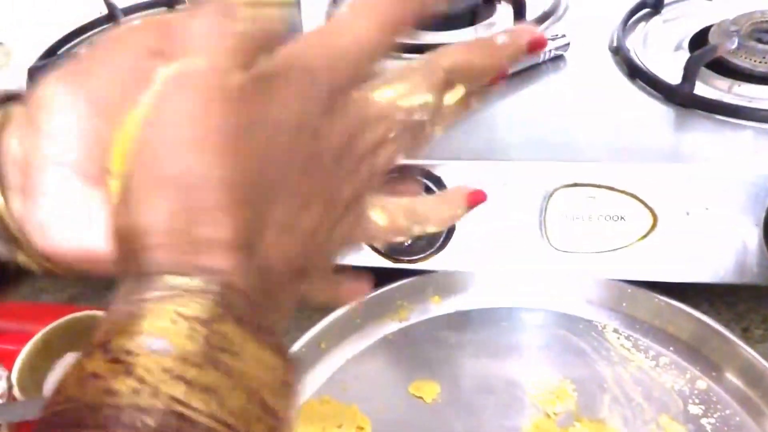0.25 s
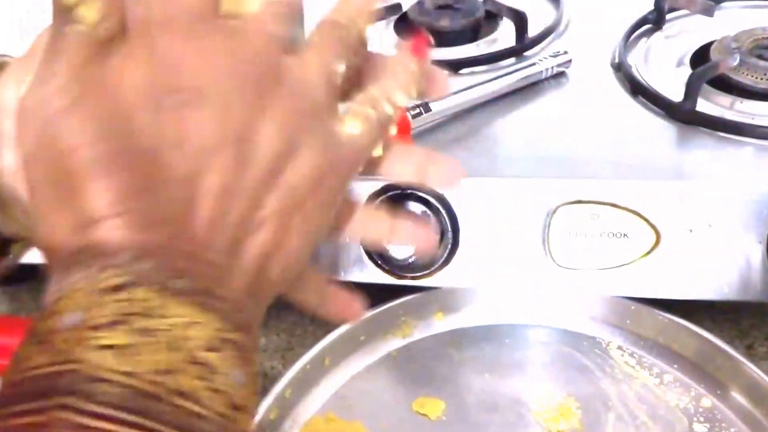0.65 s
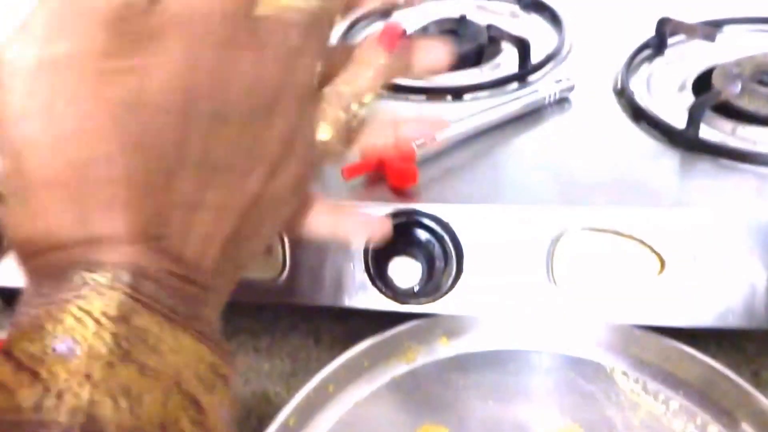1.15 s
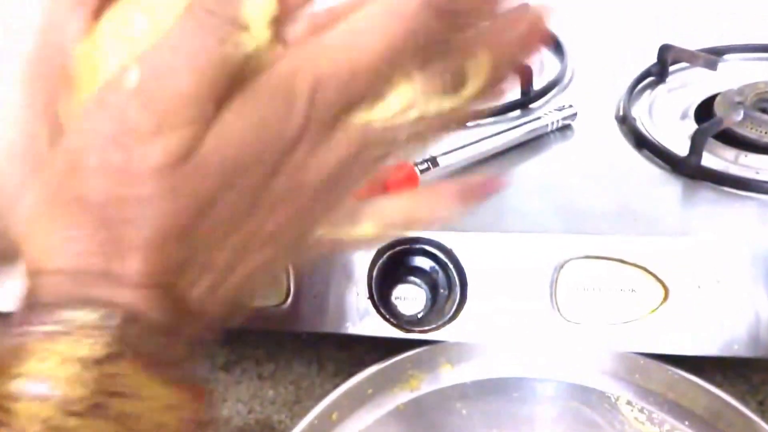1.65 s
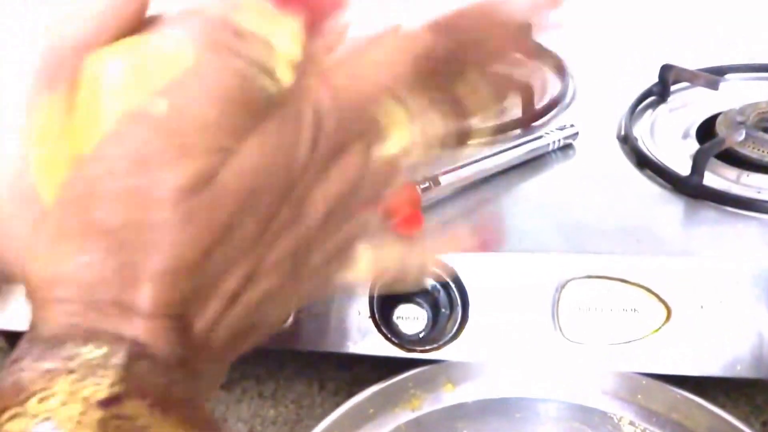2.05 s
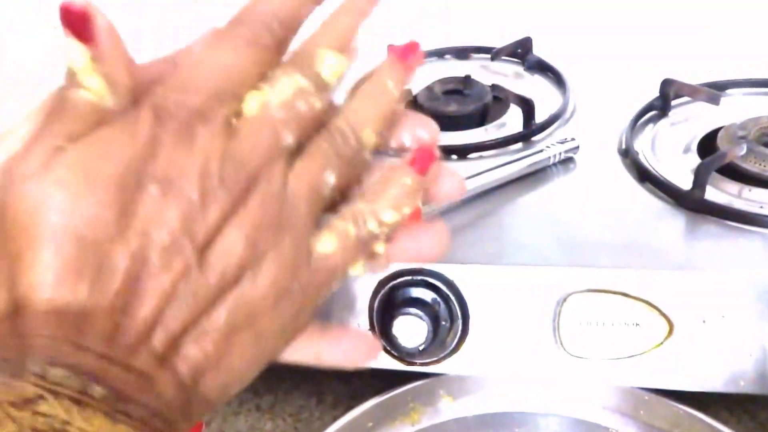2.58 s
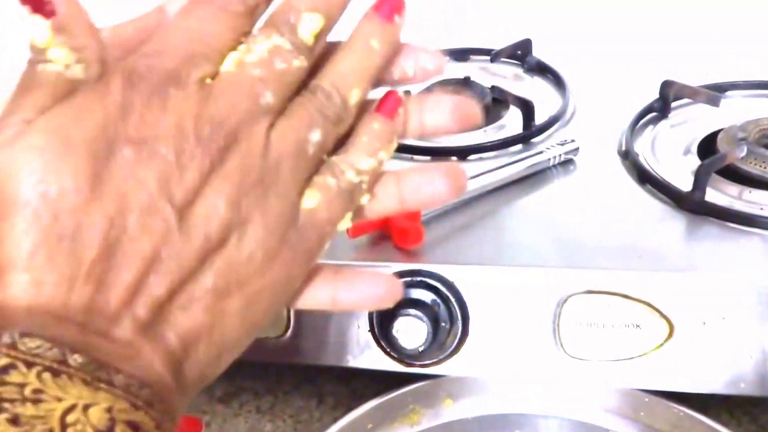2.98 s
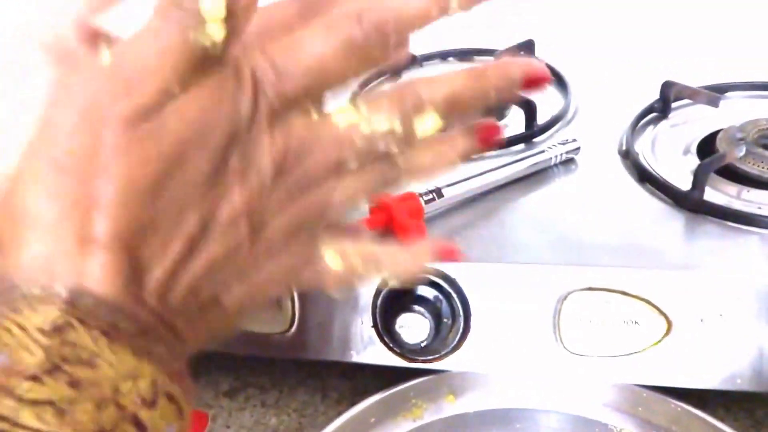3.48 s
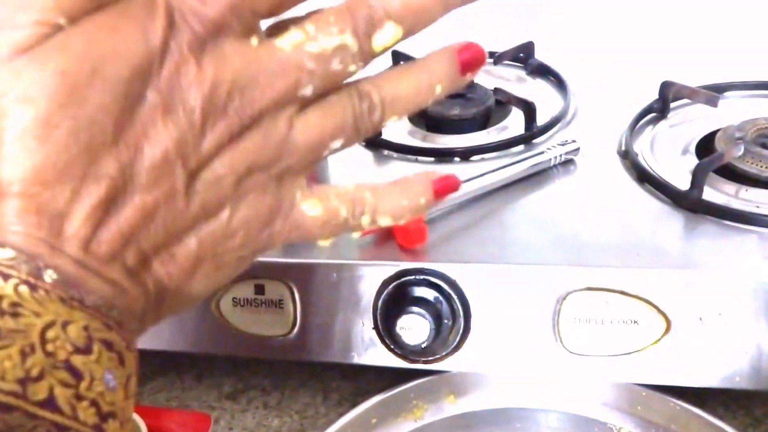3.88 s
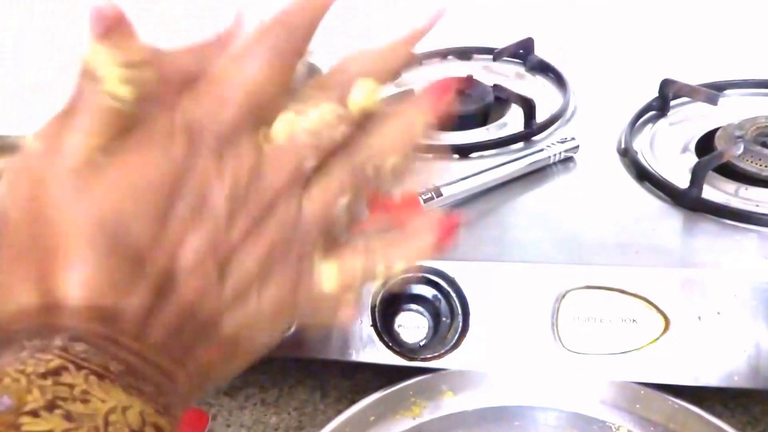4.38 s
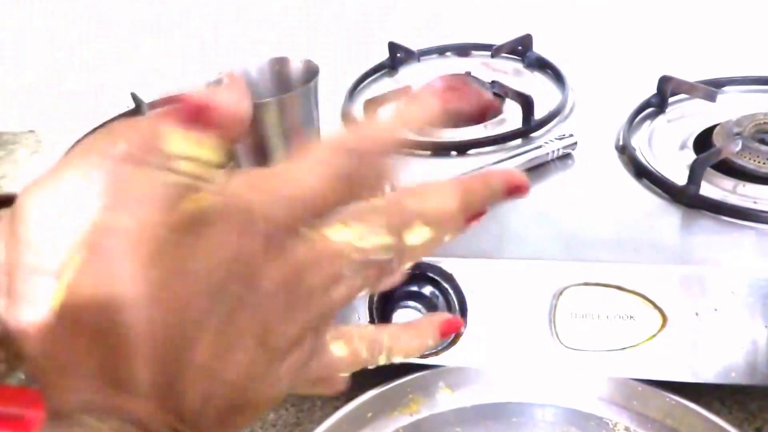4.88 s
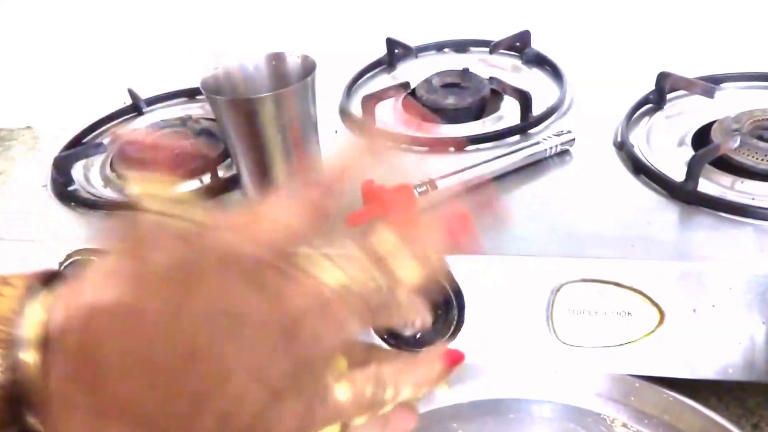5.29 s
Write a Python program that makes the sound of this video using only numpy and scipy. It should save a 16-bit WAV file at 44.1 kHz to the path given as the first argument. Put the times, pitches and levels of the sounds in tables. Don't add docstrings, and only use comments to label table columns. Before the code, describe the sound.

A close, small-microphone recording of dough patted between two hands in a hard, lively kitchen. Two faint pats with sharp bangle clinks come at 0.1 to 0.2 s, then from 0.44 s firm slaps follow about every 0.2 s until 2.35 s, with a weaker one at 2.56 s. Each is a short cluster of finger contacts: hollow air puff, slightly wet crack, bright room ring of about half a second. Thin high bangle clinks scatter between. From 2.7 to 3.3 s there is mostly quiet air, soft burner hiss and faint low motor drone. A weak pat at 3.39 s, a clink at 3.55 s, floury rubbing and a tiny falling squeak at 3.6 s precede a pat at 3.7 s. Dry sliding swishes lead to five strong pats from 4.17 to 5.06 s. Light sticky touches and small clinks finish around 5.3 to 5.4 s.

```python
import sys
import numpy as np
from scipy import signal
from scipy.fft import rfft, irfft, next_fast_len
from scipy.io import wavfile
from scipy.ndimage import uniform_filter1d

SR = 44100
rng = np.random.default_rng(int(sys.argv[2]) if len(sys.argv) > 2 else 0)


def log_audio(samples):
    frames = np.atleast_2d(samples).T
    limited = np.clip(frames, -1, 1)
    pcm = np.round(limited * 32767).astype(np.int16)
    wavfile.write(sys.argv[1], SR, pcm)


def volts(x):
    e = np.asarray(x, float) / 20
    return 10 ** e


N = 244314
TIME = np.arange(N) / SR
FULL_PAT_DB = -20

# wet crack in dB, lower pocket in dB, pocket ring length as a factor,
# finger gap in Hz, finger gap in dB.
HANDS = [(2.5, 8, 0.9, 3100, -25), (-1, 2, 1.5, 3000, 0), (0, -1.5, 1.1, 5700, 0.5),
         (-14, -8, 0.91, 1840, -8.5), (2.5, 3.5, 1.9, 3220, -3), (1, -2, 1.9, 4800, -4),
         (-1, -6, 1.3, 8600, -18), (3.5, -1, 1.06, 1930, -6), (-3.5, -3, 0.6, 3630, -11.5),
         (3.5, -1, 1.8, 3970, -8), (-1.5, 0, 1.3, 5770, 1.5), (5.5, 3.5, 2.6, 3600, -22),
         (-14, 4, 1.3, 3230, -5.5), (-1.5, -7, 2.8, 3200, -17), (3, -1, 0.99, 3500, -2),
         (-5.5, -21, 0.69, 6400, 0), (1.5, 4.5, 1.1, 2560, -8), (1, 2, 0.6, 2300, -27),
         (-6, 1, 1.15, 3350, -8), (-0.5, -4.5, 1.1, 4900, -28), (-3, 6.5, 2.2, 3300, -13)]
# cupped palm in dB, first crease in Hz, its level in dB,
# second crease in Hz, its level in dB.
CREASES = [(-2.5, 1240, -3, 4560, 2), (-1, 1245, -2, 2775, -4), (2.5, 2020, -11, 3670, -9),
           (-4, 2070, -12, 3300, -13), (-2, 1600, -1, 3330, -2), (-0.5, 1140, -5, 2700, -8),
           (-0.5, 3880, -11, 4800, -10), (0, 3130, -6, 3580, -11), (-1.5, 2200, -12, 4480, -19.5),
           (1, 1260, -4, 3300, -19), (0, 4850, -9, 5500, -10), (0, 780, -2.5, 4045, -20),
           (0.5, 2780, -5, 3000, -11), (-3, 1140, -6, 1530, -2.5), (1.5, 1240, -1, 2320, -6.5),
           (0, 1095, -13, 3695, -11), (-7, 1110, -6, 2285, -10), (-1, 1115, -9, 2765, -12),
           (-1, 1250, -6.5, 2700, -7), (-1, 845, -7, 2650, -13), (-0.5, 1180, -7, 3725, -13)]
CREASE_LIFE_S, CREASE_DIRECT_DB = 0.0029, -9.5


def contact(s, db, hz, wet_db, cycles):
    lead = 150 / SR
    t = np.arange(800) / SR - lead
    after = np.maximum(t, 0)
    k = nearest(s)
    _, _, linger, gap_hz, gap_db = HANDS[k]
    cup_db, *creases = CREASES[k]
    _, _, low_hz, low_db, high_hz, high_db, crack_db = palm(s)

    closing = np.exp(-(t * hz / (.35 * cycles)) ** 2)
    swell = np.where(t < 0, closing, np.exp(-after * hz / (.7 * cycles)))
    puff = -np.cos(2 * np.pi * hz * t) * swell

    ring = np.zeros(len(t))
    for f, g, life in [(low_hz, low_db, .002), (high_hz, high_db, .0013), (gap_hz, gap_db, .001)]:
        ring += volts(g + wet_db - 6.5) * np.sin(2 * np.pi * f * after) * np.exp(-after / (life * linger))
    for f, g in np.reshape(creases, (2, 2)):
        whistle = np.sin(2 * np.pi * f * after) * np.exp(-after / CREASE_LIFE_S)
        ring += volts(g + wet_db + CREASE_DIRECT_DB) * whistle
    push = (volts(cup_db) - 1) * uniform_filter1d(puff + ring, size=40)

    wet = volts(crack_db + wet_db + 3) * signal.lfilter([.6], [1, -.4], rng.standard_normal((2, len(t))))
    snap = np.exp(-np.abs(t) / 0.00071)
    peel = volts(-4.0) * np.exp(-np.abs(t) / np.where(t < 0, 0.0011, 0.0018))
    crack = (wet[0] + 0.29 * wet * [[0], [1]]) * (snap + peel)

    side_db = rng.standard_normal() * np.array([[1], [-1]])
    sound = puff + push + ring * volts(side_db) + crack
    return s - lead, volts(db - 3.5 - duck_db(s + 1 / SR)) * sound * volts(side_db + [[.3], [-.3]])


# start in seconds, peak in dB, trapped air in Hz, upper air pocket in Hz,
# upper pocket in dB.
SLAPS = [(0.0753, -25, 3320, 3240, 5), (0.183, -25.5, 3500, 3720, 5), (0.4367, -4.5, 4430, 3600, -8),
         (0.5486, 1.5, 3530, 4400, -2), (0.6546, -21, 2860, 3720, 1), (0.8644, -2, 3000, 2600, -0.5),
         (1.0676, -0.5, 2180, 2630, -3), (1.292, -2.5, 2800, 3260, -6), (1.52, 0.5, 2770, 2580, -13.5),
         (1.7363, 0.5, 3270, 3410, -3.5), (1.9349, 1, 3180, 3420, -0.5), (2.1455, -2, 3870, 2200, -16),
         (2.3414, 1.5, 2500, 2620, 1), (2.562, -10, 2120, 2690, -4), (3.389, -18, 1950, 2370, 1),
         (3.6964, -4, 6350, 2000, -4), (4.173, 1, 2880, 3740, -8), (4.4129, -0.5, 2240, 2590, -9.5),
         (4.6215, 0, 1700, 2830, -4.5), (4.8509, -2, 1230, 2550, -17), (5.0644, -0.5, 1380, 2740, -10.5)]
# start in seconds, peak in dB.
FINGERS = [(0.4372, -20), (0.4418, -19), (0.652, -10.5), (0.858, -29), (0.8613, -13.5), (0.8702, -12),
           (1.0662, -20), (1.0738, -18), (1.2888, -3.5), (1.5187, -3.5), (1.7346, -6.5), (1.74, -9),
           (1.9353, -3), (1.9403, -7.5), (2.1488, -10), (2.342, -10), (2.3451, -3), (2.5562, -16),
           (2.5622, -19), (3.387, -29), (3.396, -16.5), (4.1676, -11), (4.1706, -5), (4.415, -6),
           (4.614, -19), (4.6185, -7.5), (4.6276, -4.5), (4.8488, -16.5), (4.852, -9), (4.8558, -9.5),
           (4.8625, -12), (5.0755, -14.5), (5.0619, -22), (5.0696, -11)]
# start in seconds, peak in dB, trapped air in Hz,
# wet crack and pockets in dB.
TOUCHES = [(0.655, -7.5, 1540, 3.5), (0.8028, -23, 2000, -6), (0.731, -28, 7000, -8),
           (0.999, -30, 7500, -8), (1.125, -26, 4460, 0), (3.527, -31, 9070, -6), (3.6, -22, 6000, -14),
           (3.622, -30, 7000, -6), (3.649, -25, 7000, -13), (3.708, -22, 7000, -9), (4.028, -24, 7000, -9),
           (4.1, -21, 6500, -6), (4.185, -17, 8000, 3), (4.265, -17, 6200, -11), (4.27, -32, 3180, -9),
           (5.282, -19, 2400, -4), (5.289, -22.5, 1620, 1.5), (5.4205, -32, 2300, -16),
           (5.375, -37, 4650, -8), (5.4125, -30, 4600, -15), (5.413, -22.5, 2100, -14),
           (5.4158, -28, 2470, -18)]
TOUCH_CYCLES = 2.2


def fingers():
    out = np.zeros((2, N))
    firm = [row[:3] for row in SLAPS] + [(s, db, palm(s)[0]) for s, db in FINGERS]
    contacts = [row + (0, 1) for row in firm] + [row + (TOUCH_CYCLES,) for row in TOUCHES]
    for row in contacts:
        add(out, *contact(*row))
    return out


# start in seconds, echo in dB, lower air pocket in Hz,
# cupped palm in Hz, smack in dB.
PATS = [(0, -47, 1110, 1120, 11.5), (0.181, -50.5, 1220, 1500, 1), (0.437, -39.5, 1000, 1400, 7.5),
        (0.548, -43.5, 1490, 1730, -14), (0.6545, -32.5, 1094, 1350, -9), (0.8643, -33.5, 1136, 1800, 3),
        (1.0685, -36.5, 1030, 1490, 10), (1.2879, -31.5, 950, 1390, 6.5), (1.5197, -16.5, 1010, 1450, -2.5),
        (1.7356, -30.5, 930, 1400, 7), (1.935, -25.5, 1147, 2760, 10.5), (2.1448, -26, 757, 810, 0.5),
        (2.3415, -26.5, 870, 2070, -6.5), (2.5563, -39.5, 1104, 1560, 6), (3.3866, -42.5, 1180, 1750, 8),
        (3.6969, -41, 1250, 1530, 5), (4.169, -28.5, 1390, 1600, 3), (4.4126, -20.5, 955, 1090, -14.5),
        (4.6214, -24.5, 1142, 1300, -10.5), (4.8488, -24, 830, 840, -7), (5.0638, -26.5, 1090, 1190, -8.5)]
# time in seconds, level in dB.
DOUGH = [(0, -10.5), (.65, -12), (1.07, -13), (1.5, -18), (1.93, -9), (2.14, -7.5), (2.34, -10), (2.6, -27),
         (3.7, -22), (4.17, -19), (4.41, -26), (4.62, -37), (4.85, -21), (5.06, -25)]
# frequency in Hz, t60 in seconds.
KITCHEN = [(150, 0.55), (600, 0.77), (1500, 0.66), (4000, 0.59), (9000, 0.47), (15000, 0.38)]
# frequency in Hz, likeness from -1 to 1.
ECHO_ALIKE = [(60, 0.99), (550, 0.95), (5000, 0.88), (15000, 1)]
THUD_SLOPE = -0.66
CREASE_WIDTH_HZ = 120


def echoes():
    out, t = np.zeros((2, N)), np.arange(SR * 2 // 3) / SR
    for (s, db, _, _, smack_db), slap, (cup_db, *creases) in zip(PATS, SLAPS, CREASES):
        thud_db = np.interp(s, *np.transpose(DOUGH)) + THUD_SLOPE * (db - FULL_PAT_DB)
        _, cup_hz, low_hz, low_db, high_hz, high_db, _ = palm(slap[0])
        gap_hz, gap_db = HANDS[nearest(slap[0])][3:]

        def tail_gain(f, u):
            colour = volts(cup_db) * resonance(f, cup_hz, 1.38 * cup_hz) ** 1.94 / (1 + (f / 3800) ** 6)
            colour = colour + volts(low_db + 1.0) * resonance(f, low_hz, 340) ** 1.29
            colour = colour + volts(high_db + 1.0) * resonance(f, high_hz, 540) ** 1.48
            colour = colour + volts(gap_db) * resonance(f, gap_hz, 390) ** 1.8
            for hz, g in np.reshape(creases, (2, 2)):
                colour = colour + volts(g) * resonance(f, hz, CREASE_WIDTH_HZ) ** 2
            colour = colour + volts(thud_db + 1.0) * resonance(f, 200, 167)
            smack = resonance(f, 5750, 5700) ** 1.8 + volts(-7.5) * resonance(f, 10500, 6700)
            colour = colour + volts(smack_db - 9.5) * smack
            return colour * volts(-60 * u / along(KITCHEN, f)) * lumps(len(f), len(u))

        tail = spread(len(t), tail_gain, ECHO_ALIKE)
        build = (1 - np.exp(-t / 0.0018)) * (1 + 1.38 * np.exp(-t / 0.0069))
        add(out, s, volts(db + 8.0 - duck_db(s + 0.04)) * build * tail)
    return out


# frequency in Hz, width in Hz, level in dB.
ROOM_MODES = [(206.6, 8.7, 6), (289, 31, 5), (455, 71, 0.5), (754, 20, -7), (810, 44, -7), (914, 47, -3.5),
              (1090, 39, -2.5), (1245, 23, -12), (1390, 32, -3.5), (1490, 30, -5), (1560, 49, -9),
              (2746, 24, -2)]


def room_modes(x):
    size = next_fast_len(N + SR // 4)
    f = np.fft.rfftfreq(size, 1 / SR)
    lift = sum(volts(db) * 1j * f * width_hz / (hz * hz - f * f + 1j * f * width_hz)
               for hz, width_hz, db in ROOM_MODES)
    return irfft(rfft(x, size) * (1 + lift), size)[:, :N]


# frequency in Hz, level in dB, t60 in seconds.
BANGLES = [(3630, -13, .2), (4565, -11, .25), (4680, -14, .2), (5820, -10, .3), (6078, -6, .2),
           (8400, -9, .15), (8700, -3, .18), (8790, 1, .16), (9076, -7, .15), (9350, -9, .15),
           (9710, -1, .28), (9935, -1, .22), (10150, -13, .15), (11400, -10, .2), (11650, 2, .18),
           (12360, -10, .15), (13300, -14, .2), (14060, -4, .2), (14150, -5, .3), (14280, -2, .35),
           (14540, -3, .2), (14800, -14, .2), (15050, -10, .25), (15230, -7, .3), (15520, -15, .2)]
MIDDLE_DB, MIDDLE_FOLLOWS = -3.5, 0.39
UPPER_DB, UPPER_FOLLOWS = -2.5, 0.94


def clink(t, low_db, linger, lowest_db, more_middle_db, more_upper_db):
    hz, level, t60 = np.array(BANGLES).T[:, :, None]
    group = np.digitize(hz[:, 0], [5200, 7000, 10600, 13000])
    middle_db = MIDDLE_DB + MIDDLE_FOLLOWS * low_db + more_middle_db
    upper_db = UPPER_DB + UPPER_FOLLOWS * low_db + more_upper_db
    group_db = np.array([low_db + lowest_db - 2.0, low_db + 0.36, middle_db + 7.0, upper_db + 7.5, 0])

    luck = rng.standard_normal((len(hz), 2))
    strength = volts(level + 3.5 * np.tanh(luck[:, :1]))
    share = strength / np.sqrt(np.bincount(group, strength[:, 0] ** 2))[group, None]

    walk = np.cumsum(rng.standard_normal((len(hz), len(t) // 8 + 1)), 1)
    drift = 0.2 * np.minimum(hz / 9000, 1) * np.repeat(walk, 8, axis=1)[:, :len(t)]
    rattle = np.repeat(rng.standard_normal((len(hz), len(t) // 256 + 1)), 256, axis=1)[:, :len(t)]
    rattle_db = uniform_filter1d(5.6 * rattle, size=128, axis=1)

    ring_s = 0.5 * linger * np.minimum(t60, .35) * np.where(hz < 7000, .7, 1)
    fall_db = 60 * t / np.clip(ring_s, .02, .4)
    tone = np.sin(2 * np.pi * hz * (1 + 0.00398 * luck[:, 1:]) * t + drift)
    modes = share * volts(group_db[group, None] + rattle_db - fall_db) * tone
    tick = volts(-2) * np.diff(rng.standard_normal(len(t) + 2), n=2) * np.exp(-t / 0.00053)
    return modes.sum(0) * (1 - np.exp(-t / 0.00044)) + tick


# start in seconds, peak of the top modes in dB, low modes in dB, ring
KNOCKS = [(0.1725, -11, -14, 0.22), (0.178, -8.5, -16, 0.91), (0.1985, -25, -4, 0.56),
          (0.373, -20.5, -19.5, 1.2), (0.4776, -10.5, -7.5, 0.57), (0.5915, -15, -16, 1.26),
          (0.6138, -16, -18, 1.2), (0.6423, -22, -10.5, 0.72), (0.6984, -25, -10.5, 4.3),
          (0.812, -20.5, -10.5, 1.5), (1.0566, -7.5, -27, 0.6), (1.0655, -18.5, -11.5, 1.2),
          (1.2037, -20, -11.5, 1.6), (1.232, -14.5, -18, 0.72), (1.2657, -21, -15, 1.3),
          (1.4772, -13, -12, 0.56), (1.699, -21, -13, 1.6), (2.0987, -19.5, -24, 0.77),
          (2.5164, -18, -11.5, 1.7), (2.727, -25.5, -13, 0.98), (3.5517, -11, -15, 0.66),
          (4.3423, -11.5, -11, 1.1), (4.3558, -9, -13.5, 1.1), (4.3748, -17.5, -4, 0.98),
          (4.552, -23.5, -15.5, 1.5), (4.6478, -21.5, -7, 0.96), (5.0378, -21, -17, 4),
          (5.278, -19.5, -21, 0.65), (5.282, -20.5, -8.5, 0.46), (5.433, -34.5, -5.5, 0.55)]
# start in seconds, peak of the top modes in
# dB, low modes in dB.
MORE_KNOCKS = [(0.2787, -31, -2), (0.407, -33.5, -8), (0.485, -24, -20), (0.5227, -32, 0), (0.899, -26.5, -10),
               (0.969, -27.5, -4), (1.4533, -36, -11), (1.601, -27, -15), (1.689, -24, -14),
               (1.913, -28.5, -7), (2.1233, -28, 0), (2.172, -27, 6), (2.3272, -27, -7), (2.374, -33.5, -2),
               (2.4277, -33, -2), (2.4692, -30, -9), (3.3616, -44, 1), (3.428, -32.5, -10.5),
               (1.282, -26, -17), (3.848, -26, -10.5), (3.942, -39, -8), (4.05, -36, -20), (4.159, -32, -15),
               (4.8137, -31, -11), (4.835, -22, -10), (4.8912, -26.5, -12.5), (4.998, -34, -4),
               (5.0852, -25.5, -2), (0.207, -23, -18), (0.494, -21, -20), (1.0584, -6, -25), (3.563, -14, -15)]
MORE_KNOCK_LINGER = [0.98, 0.8, 1.1, 1.1, 1.2, 1.1, 1, 1.9, 1.1, 1, 0.8, 0.85, 0.94, 1.5, 1.2, 1.2, 0.8, 1.3,
                     0.8, 0.75, 0.7, 0.5, 0.5, 1.4, 1.1, 1.6, 1.2, 1.1, 0.8, 0.5, 0.3, 0.4]
# lowest modes in dB, middle modes in dB, upper modes in dB.
MEETING_DB = [(1, -6, -3), (-0.5, 1.5, 2.5), (0, -8, -1), (5, 2, -1), (-1.5, 0.5, -7), (-3, 0.5, 7.5),
              (7.5, 3, 7), (15, 3, -7), (0, -4, -7), (5.5, -0.5, -1), (6, 0.5, -2), (9, 2, 6),
              (-4, -1.5, -6), (1.5, -5, -3), (-4, 2.5, -1.5), (-1, -1, 1), (8, -1.5, 6), (-1, 0, -1),
              (-12, -4, 0.5), (2, 0, 0), (-5, 1.5, 3), (-1, -3.5, -4), (-3, -2.5, -4), (-2.5, -6, -5),
              (-1, -3, 1), (8, 0, -2), (1, 0.5, -1), (-6, -4, 3), (6, -1, 1.5), (-4, 1, -2)]
# lowest modes in dB, middle modes in dB, upper modes in dB.
MORE_MEETING_DB = [(-1, -6, -6), (2, -1, 2), (-1, -1, -1), (1, -7, 3), (-5, -5, -1), (-3, -4, -0.5),
                   (-2, -6, -1), (-1, -1, -1), (-1, 3, -4), (-1, 0, -3), (-12, 0, 0), (-11, -6, -2.5),
                   (3, -3, 7), (9, 1, -7), (0, -7, 4.5), (-1, -3, -3), (-1, -2, -1), (7, 3, 7),
                   (-1, -1, -1), (-2.5, 0.5, -8), (4, 2, -3), (-1, -6, -6), (6, -6, -6), (-1, 1, -4),
                   (-3, -4, -1), (-6, -2, 0), (-1, -1.5, -4), (-12, 0, -7), (1, -9, -6), (-1, -3, -3),
                   (-1, 1.5, -3), (-1, -1, -1)]


def bangles():
    direct, t = np.zeros(N), np.arange(SR // 5) / SR
    contacts = KNOCKS + [row + (linger,) for row, linger in zip(MORE_KNOCKS, MORE_KNOCK_LINGER)]
    for (s, db, low_db, linger), meeting_db in zip(contacts, MEETING_DB + MORE_MEETING_DB):
        add(direct, s, volts(db - 9.0 - duck_db(s)) * clink(t, low_db, linger, *meeting_db))
    room = spread(SR // 2, lambda f, u: volts(-60 * u / (0.73 * along(KITCHEN, f))),
                  [(3000, 1.0), (15000, 0.92)])
    wet = signal.fftconvolve(direct[None], room / np.linalg.norm(room[0]), axes=1)[:, :N]
    return (direct + volts(-1.0) * wet) * volts([[1.1], [-1.1]])


# start in seconds, hold in seconds, level in dB.
STROKES = [(0, 0.14, -58), (0.206, 0.22, -54), (0.59, 0.2, -47.5), (0.9, 0.11, -52), (1.254, 1.05, -57),
           (2.761, 0.1, -53), (3.258, 0.049, -50), (3.57, 0.078, -45.5), (3.7, 0.23, -62),
           (4.038, 0.065, -44), (4.142, 0.07, -62), (4.245, 0.045, -40.5), (4.348, 0.4, -47.5),
           (5.077, 0.13, -46), (5.29, 0.11, -55.5)]
# frequency in Hz, level in dB per Hz.
FLOUR = [(800, -13), (2000, -7), (4500, -6.5), (7500, -3), (11000, -2), (15500, -5), (16500, 0.5)]
STROKE_RISE_DB_PER_S, STROKE_FALL_DB_PER_S, RESTING_DB = 512, 236, -68


def slide():
    grit = 1 + 0.35 * np.minimum(rng.exponential(size=N), 4) ** 2 * (rng.random(N) < .03)
    hiss = unit(spread(N, lambda f, u: volts(along(FLOUR, f)) + 0 * u, [(2000, 0.88), (15000, 0.99)]))
    level = volts(RESTING_DB)
    for s, hold, db in STROKES:
        rise_db = STROKE_RISE_DB_PER_S * np.maximum(s - TIME, 0)
        fall_db = STROKE_FALL_DB_PER_S * np.maximum(TIME - s - hold, 0)
        level = level + volts(db - rise_db - fall_db)
    return level * volts(8.5) * grit * hiss


SQUEAK_S, SQUEAK_LENGTH_S, SQUEAK_DB = 3.605, 0.06, -48
SQUEAK_HZ, SQUEAK_END_HZ = 3950, 2950


def squeak():
    out = np.zeros(N)
    u = np.arange(round(SQUEAK_LENGTH_S * SR)) / (SQUEAK_LENGTH_S * SR)
    hz = SQUEAK_END_HZ + (SQUEAK_HZ - SQUEAK_END_HZ) * (1 - u) ** 1.3
    rough = 0.13 * np.cumsum(rng.standard_normal(len(u)))
    whistle = np.sin(2 * np.pi * np.cumsum(hz) / SR + rough)
    add(out, SQUEAK_S, volts(SQUEAK_DB) * np.sqrt(np.sin(np.pi * u)) * whistle)
    return out


# frequency in Hz, level in dB per Hz.
HUSH = [(15, -16), (40, 2), (97, -3), (160, -4.5), (310, 0), (600, -2), (1000, -0.5), (1760, -1),
        (3000, -10), (6000, -16.5), (10000, -21), (15500, -32)]
# frequency in Hz, likeness from -1 to 1.
HUSH_ALIKE = [(60, 0.98), (180, -0.13), (550, -0.85), (1650, -0.66), (4970, 0.16), (15000, -0.0026)]
# frequency in Hz, width in Hz, level in dB.
BURNER = [(271, 52, -3), (1090, 105, -0.5), (1522, 120, 2), (1610, 41, -5), (3130, 60, -11.5)]
# middle in seconds, half-width in seconds, peak in dB.
SWELLS = [
    (.58, 0.092, -44),
    (1.13, 0.21, -55),
    (1.75, 0.084, -46),
    (2.95, 0.35, -65),
    (3.95, 0.23, -52.5),
]
IDLE_DB = -64.5
FLAME_WAVER = 0.026


def hush():
    def steady(gain, alike):
        return unit(spread(N, lambda f, u: gain(f) + 0 * u, alike, window=4096))

    def flame(f, u):
        gain = 0
        for hz, width_hz, db in BURNER:
            waver = np.interp(u, np.arange(60) / 10, rng.standard_normal(60))
            gain = gain + volts(db) * resonance(f, hz * (1 + FLAME_WAVER * waver), width_hz) ** 2
        return gain

    air = steady(lambda f: volts(along(HUSH, f)), HUSH_ALIKE)
    stove = unit(spread(N, flame, [(100, 1.0), (600, 0.36)], window=2048))
    drone = steady(lambda f: resonance(f, 91.4, 15) ** 2, [(100, 0.94)])
    swells = volts(IDLE_DB) + sum(volts(db) * np.exp(-((TIME - s) / half) ** 2) for s, half, db in SWELLS)
    return volts(-49.5) * air + volts(-54.0) * stove + swells * drone


EARLY_PITCH, LATE_PITCH = 0.84, 0.53
POCKET_DB, POCKET_SLOPE = -6, -0.027
CRACK_DB, CRACK_SLOPE = -18.5, -0.39


def palm(s):
    k = nearest(s)
    _, echo_db, low_hz, cup_hz, _ = PATS[k]
    slap_s, _, air_hz, high_hz, high_db = SLAPS[k]
    soft_db = echo_db - FULL_PAT_DB
    pitch = EARLY_PITCH if s < slap_s else LATE_PITCH
    low_db = POCKET_DB + POCKET_SLOPE * soft_db + HANDS[k][1]
    crack_db = CRACK_DB + CRACK_SLOPE * soft_db + HANDS[k][0] + 1
    return pitch * air_hz, cup_hz, low_hz, low_db, high_hz, high_db, crack_db


def nearest(s):
    return np.argmin([abs(row[0] - s) for row in SLAPS])


DUCK_DB, DUCK_SLOPE = 7, 0.39


def duck_db(s):
    start, echo_db = np.array(PATS).T[:2]
    since = np.asarray(s)[..., None] - start
    depth_db = np.abs(DUCK_DB + DUCK_SLOPE * (echo_db - FULL_PAT_DB))
    return -np.sum(depth_db * (since >= 0) * np.exp(-np.abs(since) / 0.022), -1)


def lumps(rows, columns):
    field = uniform_filter1d(rng.standard_normal((rows, columns)), size=3, axis=0)
    field = uniform_filter1d(field, size=4, axis=1)
    return volts(1.5 * unit(field))


def spread(size, gain, alike, window=512):
    hz, t, z = signal.stft(rng.standard_normal((2, size)), SR, nperseg=window)
    turn = np.arccos(np.clip(along(alike, hz), -1, 1))[:, None] / 2
    mid, side = z * gain(hz[:, None], t) * [np.cos(turn), np.sin(turn)]
    return signal.istft(np.array([mid + side, mid - side]), SR, nperseg=window)[1][:, :size]


def resonance(f, hz, width_hz):
    return np.abs(f * width_hz / (hz * hz - f * f + 1j * f * width_hz))


def along(points, hz):
    f, v = np.transpose(points)
    return np.interp(np.log(hz + 1), np.log(f + 1), v)


def unit(x):
    return x / np.sqrt(np.mean(x ** 2) + 1e-20)


def add(track, s, sound):
    part = track[..., max(round(s * SR), 0):][..., :sound.shape[-1]]
    part += sound[..., :part.shape[-1]]


def scene():
    return fingers() + room_modes(echoes()) + bangles() + slide() + squeak() + hush()


def band_limit(x):
    return signal.sosfilt(signal.butter(12, 16640, fs=SR, output="sos"), x)


def record(dry):
    x = signal.sosfilt(signal.butter(3, 130, "high", fs=SR, output="sos"), dry)
    rumble = spread(N, lambda f, u: resonance(f, 47, 66) ** 0.53 + 0 * u, [(30, 1.0), (100, 0.99)], window=6700)
    x = (x + volts(-61.0) * unit(rumble)) * volts(duck_db(TIME))
    x = x / (1 + np.abs(x) ** 8) ** (1 / 8)
    f = np.fft.rfftfreq(N, 1 / SR)
    band = np.where(f < 15780, 1, volts(-38)) * (f < 16900)
    return band_limit(irfft(rfft(x) * band, N))


dry = scene()
out = record(dry)
log_audio(out)
```